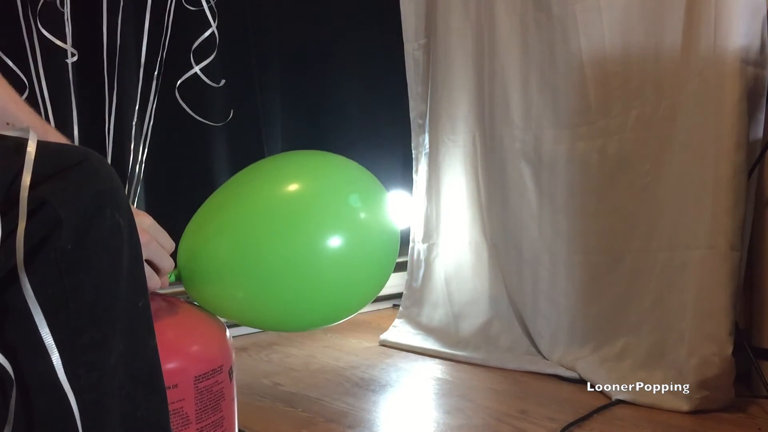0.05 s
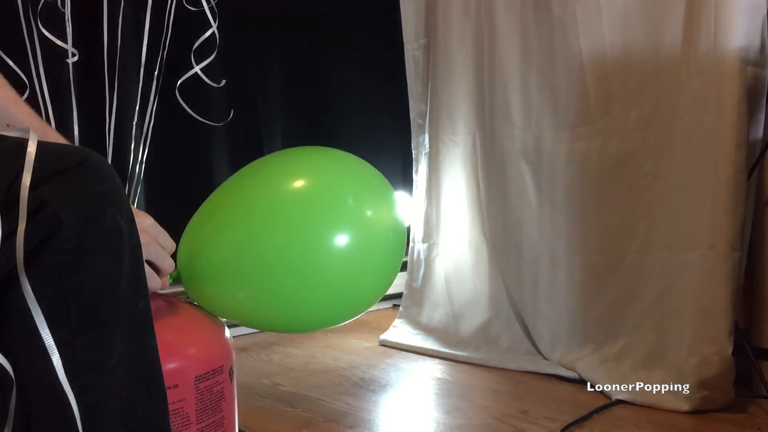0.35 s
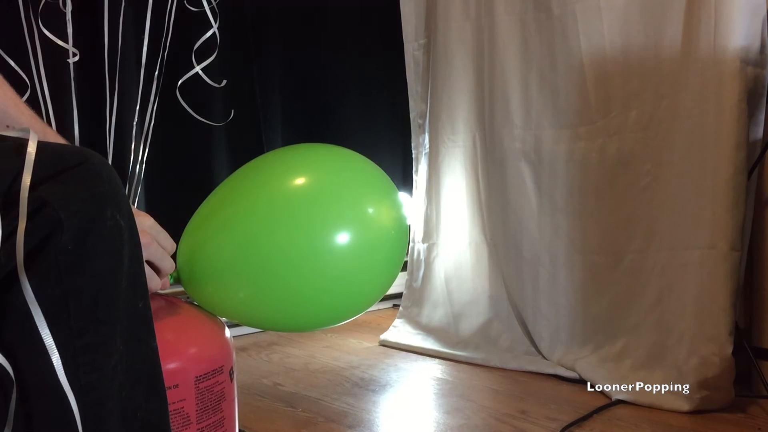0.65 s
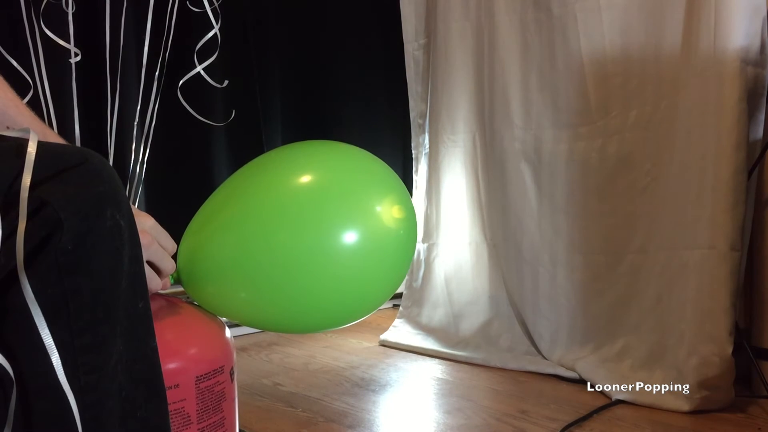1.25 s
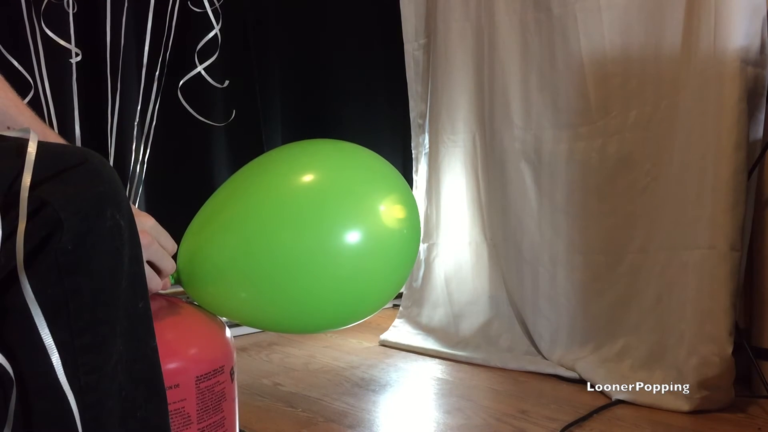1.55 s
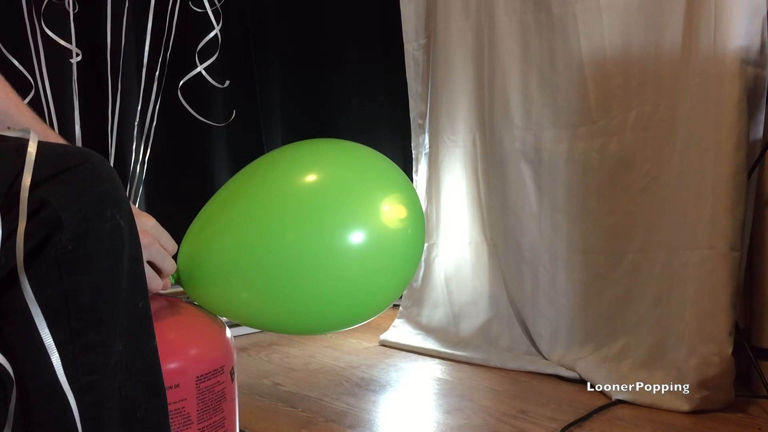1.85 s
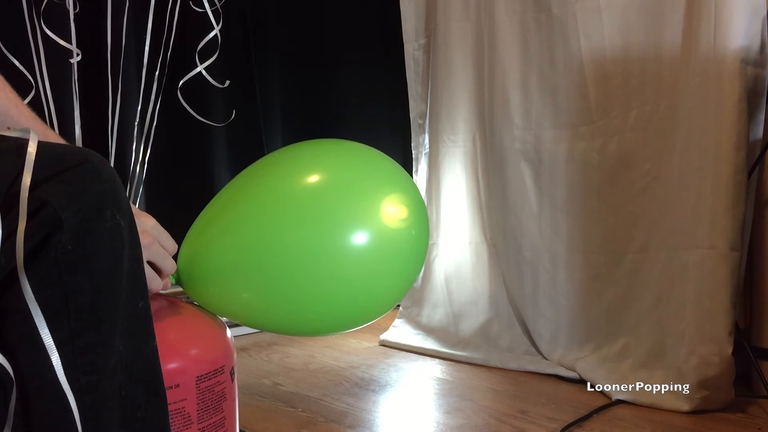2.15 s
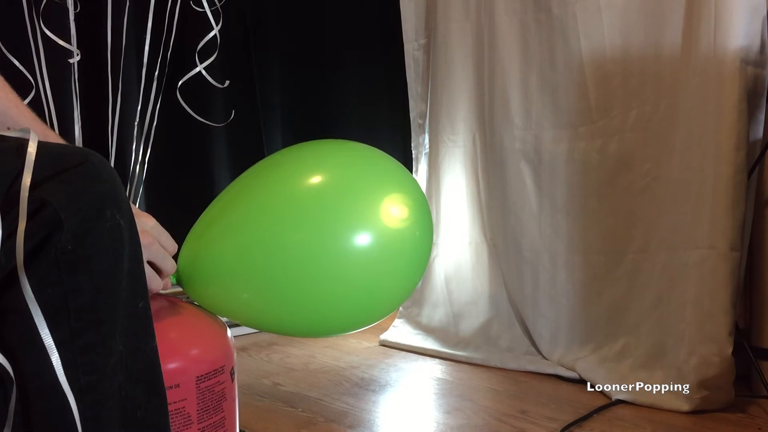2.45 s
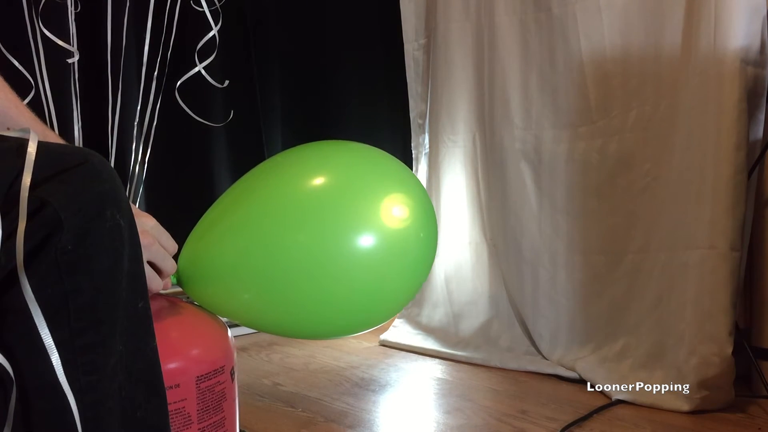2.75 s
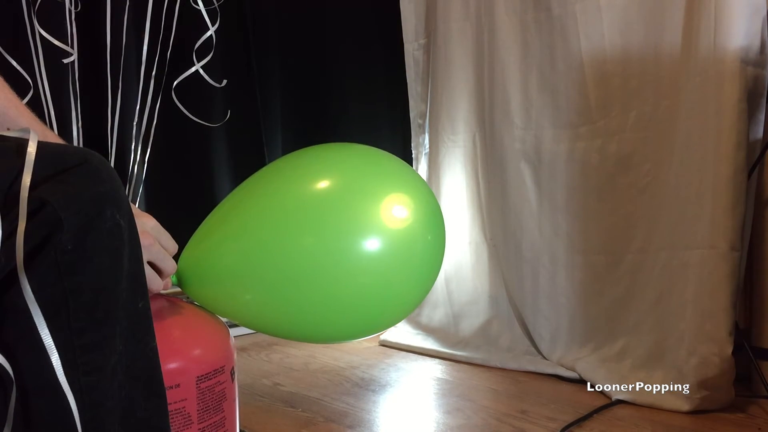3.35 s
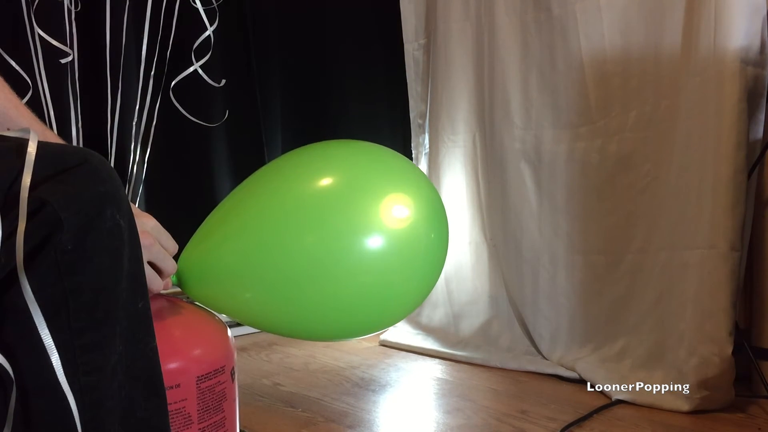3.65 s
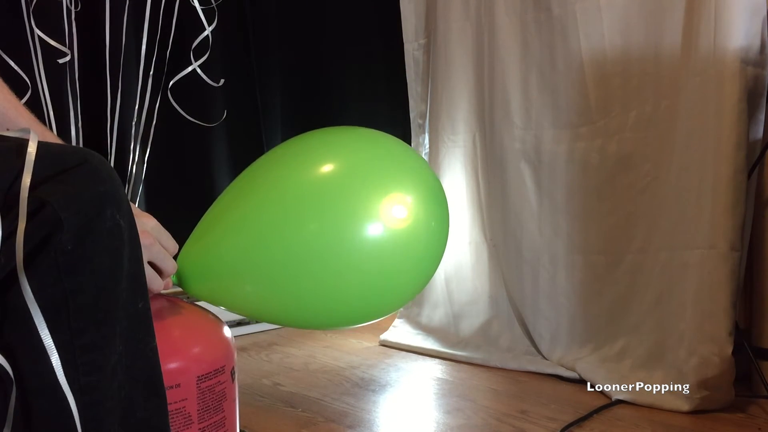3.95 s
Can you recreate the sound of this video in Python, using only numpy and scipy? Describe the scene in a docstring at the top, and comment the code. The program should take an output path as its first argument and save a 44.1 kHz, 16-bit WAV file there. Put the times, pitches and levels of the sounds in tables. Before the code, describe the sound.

Gas hisses steadily from a tank into a rubber balloon. A bright rush in the neck climbs slightly, narrows and fades as the balloon fills, while the hiss carries on close by in a quiet room.

```python
"""Gas hisses steadily from a tank into a growing balloon, over a faint low hum in a quiet room.
From the start, the jet makes the nozzle and the rubber neck ring, and the neck adds a bright rush.
A high fizz swells within the first second; a faint tone comes and goes around 1.5 s.
As the balloon fills, the rush climbs, narrows and fades, and the pattern that close echoes
leave in the hiss drifts slowly up in pitch. Near the end the fizz drops away while the jet goes on."""
import sys
import numpy as np
from scipy import signal
from scipy.fft import rfft, irfft
from scipy.io import wavfile

SR = 44100
rng = np.random.default_rng(int(sys.argv[2]) if len(sys.argv) > 2 else 0)


def file_out(sig):
    """Save sig as 16-bit WAV at sys.argv[1]."""
    # one column per channel
    cols = np.atleast_2d(sig).T
    # limit, then scale
    lim = np.clip(cols, -1, 1)
    pcm = np.round(lim * 32767).astype(np.int16)
    wavfile.write(sys.argv[1], SR, pcm)


N = 176400

# tone colour of the gas jet (frequency [Hz], relative level [dB])
JET_SPECTRUM = [(180, -51), (300, -21.5), (492, -22), (543, -20.5), (663, -16.5), (953, -15.5), (1110, -13),
                (1540, -12.5), (2100, -8.5), (2880, -7), (3400, -2.5), (3750, -3.5), (4070, -12),
                (4720, -9.5), (5130, -8), (5660, -2), (7500, -3.5), (9450, -0.5), (11000, -3.5),
                (12900, -2.5), (15500, -4.5)]
# strength of the jet (time [s], level [dB])
JET_LEVEL = [(0, -50.5), (.45, -51), (.7, -52), (2, -52.5), (3.5, -52), (4, -53)]
# the rush in the balloon's neck fades (time [s], level [dB])
NECK_LEVEL = [(0, -49.5), (.32, -48.5), (.7, -50), (1.2, -51), (1.6, -52.5), (2.2, -56.5), (2.9, -59.5),
              (3.5, -63.5), (4, -73)]
# the rush climbs (time [s], centre [Hz])
NECK_CENTRE = [(0, 6540), (.5, 6740), (1.2, 7120), (2.2, 7240), (4, 7180)]
# the rush narrows (time [s], half width [Hz])
NECK_HALF_WIDTH = [(0, 1100), (.5, 1040), (1.2, 563), (2.2, 423), (4, 278)]
# fizz at the top of the hiss (time [s], level [dB])
FIZZ_LEVEL = [(0, -72), (.35, -58), (.7, -53.5), (1.3, -54), (1.7, -56), (2.1, -56), (2.8, -56),
              (3.4, -59.5), (3.7, -60), (4, -75)]
# a thin, high hiss heard at first and again late (time [s], level [dB])
THIN_HISS_LEVEL = [(0, -55), (.3, -56), (.7, -60.5), (2, -68), (3.5, -70), (3.8, -60.5), (4, -60)]
# pitches at which nozzle and balloon ring (frequency [Hz], width [Hz], boost [dB])
RESONANCES = [(1690, 70, 3), (2080, 150, 1), (3430, 120, 3), (5480, 60, 4), (5680, 120, 2), (6030, 60, 2.5),
              (6715, 70, 3.5), (7200, 220, 1.5), (7465, 40, 3.5), (8250, 320, 3), (9450, 120, 2.5),
              (9820, 120, 3), (12350, 320, 2.5), (13200, 180, 4), (14630, 130, 4), (15710, 120, 5.5)]
# dips between those pitches (frequency [Hz], width [Hz], gain [dB])
DIPS = [(4150, 180, -2), (5150, 120, -2), (6630, 50, -4), (7740, 120, -2), (8700, 400, -3),
        (12880, 260, -2), (14190, 110, -4), (15330, 220, -1.5)]
# a brief tone under the hiss (middle [s], half length [s], pitch [Hz], width [Hz], level [dB])
FAINT_TONE = (1.47, 0.22, 521.5, 15, -81.5)
# the room's rumble before its treble is softened (frequency [Hz], relative level [dB])
RUMBLE_SPECTRUM = [(5, 2), (12, 2.5), (22, -3.5), (40, -7), (70, -12), (100, -17), (150, -17.5),
                   (250, -19.5), (400, -25.5), (800, -30)]
# two low hums (pitch [Hz], list of (time [s], level [dB]))
HUMS = [(48.5, [(0, -89), (.4, -74), (.85, -83), (1.2, -83), (1.38, -72), (1.85, -82), (2.15, -98),
        (2.45, -75), (2.8, -72), (3.1, -91), (3.35, -90), (3.5, -77), (3.75, -78), (4, -93)]),
        (64.5, [(0, -85), (.35, -79), (.7, -86.5), (1.6, -76), (2.15, -89), (2.33, -79), (2.6, -86),
        (2.92, -77), (3.7, -91), (4, -83)])]

CUT_HZ = 15780
FRAME, HOP = 2048, 512  # the hiss is shaped in short, overlapping frames [samples]
HZ = np.fft.rfftfreq(FRAME, 1 / SR)
FRAME_TIMES = np.arange(N // HOP + 3)[:, None] * HOP / SR


def hiss():
    """Four rushing noises add up, then take on the colour of the ringing and the echoes."""
    fizz = band(13600, half_width_hz=2230, steepness=8) * amp(curve(FIZZ_LEVEL))
    thin_hiss = band(10520, half_width_hz=550, steepness=4) * amp(curve(THIN_HISS_LEVEL))
    blend = np.sqrt(gas_jet() ** 2 + neck_rush() ** 2 + fizz ** 2 + thin_hiss ** 2)
    rise_per_s = 0.0018  # ringing and echo pattern climb by this share of their pitch
    sliding_hz = HZ / (1 + rise_per_s * (FRAME_TIMES - FRAME_TIMES.mean()))
    return changing_noise(blend * ringing(sliding_hz) * close_echoes(sliding_hz))


def gas_jet():
    """Spectrum of the jet: a broad hiss whose treble sinks as the pressure falls."""
    treble_db_per_s, treble_from_hz = -0.73, 3200
    treble_share = HZ ** 4 / (HZ ** 4 + treble_from_hz ** 4)
    treble_db = treble_db_per_s * (FRAME_TIMES - FRAME_TIMES.max()) * treble_share
    return unit_power(colour(JET_SPECTRUM, HZ) * (HZ < CUT_HZ)) * amp(curve(JET_LEVEL) + treble_db)


def neck_rush():
    """Spectrum of gas rushing through the rubber neck: one bright, fading band."""
    return band(curve(NECK_CENTRE), curve(NECK_HALF_WIDTH), steepness=3.76) * amp(curve(NECK_LEVEL))


def ringing(hz):
    """Nozzle and balloon boost the pitches they ring at, with dips in between."""
    return amp(sum(db / (1 + (2 * (hz - centre) / width) ** 4) for centre, width, db in RESONANCES + DIPS))


def close_echoes(hz, count=48):
    """Short echoes boost some pitches and cancel others; their paths drift as the balloon swells."""
    echo_db, decay_s, drift_s_per_s = -5, .025, .00002
    delays = np.linspace(.003, .032, count) + rng.uniform(0, .0006, count)
    drifts = drift_s_per_s * rng.standard_normal(count)
    gains = np.exp(-delays / decay_s) * rng.choice([-1, 1], count)
    gains *= amp(echo_db) / np.linalg.norm(gains)
    echoes = sum(gain * np.exp(-2j * np.pi * hz * (delay + drift * FRAME_TIMES))
                 for gain, delay, drift in zip(gains, delays, drifts))
    return unit_power(abs(1 + echoes))  # the 1 is the direct sound


def faint_tone():
    """A soft tone, made of a narrow band of noise, swells and dies away."""
    middle, half_length, pitch, width, db = FAINT_TONE
    swell = np.exp(-((np.arange(N) / SR - middle) / half_length) ** 2)
    spectrum = np.exp(-((np.fft.rfftfreq(N, 1 / SR) - pitch) / width) ** 2)
    return amp(db) * swell * steady_noise(spectrum)


def room():
    """A low rumble with two hums that waver in pitch and level."""
    rumble_db, soften_above_hz, wander_hz, wobble_share = -73, 900, 1.6, .35
    hz, t = np.fft.rfftfreq(N, 1 / SR), np.arange(N) / SR
    sound = amp(rumble_db) * steady_noise(colour(RUMBLE_SPECTRUM, hz) / (1 + (hz / soften_above_hz) ** 2))
    for pitch, level in HUMS:
        cycles = np.cumsum(pitch + wander_hz * waver(rate_hz=3)) / SR
        gain = amp(np.interp(t, *np.transpose(level))) * (1 + wobble_share * waver(rate_hz=8))
        sound += gain * np.sin(2 * np.pi * cycles)
    return sound


def amp(db):
    """Turns decibels into a gain."""
    return 10 ** (np.asarray(db) / 20)


def curve(points):
    """Reads a (time, value) table at every frame."""
    return np.interp(FRAME_TIMES, *np.transpose(points))


def colour(points, hz):
    """Joins (frequency, level) points into a gain for each frequency."""
    point_hz, db = np.transpose(points)
    return amp(np.interp(np.log(hz + 1), np.log(point_hz + 1), db))


def unit_power(gain):
    """Scales a spectrum to an average power of one."""
    return gain / np.sqrt(np.mean(gain ** 2, axis=-1, keepdims=True))


def band(centre_hz, half_width_hz, steepness):
    """A flat-topped band of frequencies."""
    return unit_power(1 / np.sqrt(1 + abs((HZ - centre_hz) / half_width_hz) ** steepness))


def changing_noise(gain):
    """Noise whose spectrum changes from frame to frame."""
    white = rng.standard_normal((len(FRAME_TIMES) - 1) * HOP)
    frames = signal.stft(white, nperseg=FRAME, noverlap=FRAME - HOP)[2]
    return signal.istft(frames * gain.T, nperseg=FRAME, noverlap=FRAME - HOP)[1][:N]


def steady_noise(gain):
    """Noise whose spectrum stays the same."""
    return irfft(rfft(rng.standard_normal(N)) * unit_power(gain), N)


def waver(rate_hz):
    """A slow, random wobble with a typical size of one."""
    return steady_noise(np.exp(-np.fft.rfftfreq(N, 1 / SR) / rate_hz))


def scene():
    """The slightly fluttering hiss, the room and the tone, alike in both channels."""
    flutter_db = .2
    fluttering_hiss = hiss() * amp(flutter_db * waver(rate_hz=9))
    return np.tile(fluttering_hiss + room() + faint_tone(), (2, 1))


def record(dry):
    """A steep filter removes the very highest treble."""
    low_pass = signal.firwin(1501, CUT_HZ, window=("kaiser", 8), fs=SR)
    return signal.oaconvolve(dry, low_pass[None], "same")


dry = scene()
out = record(dry)
file_out(out)
```